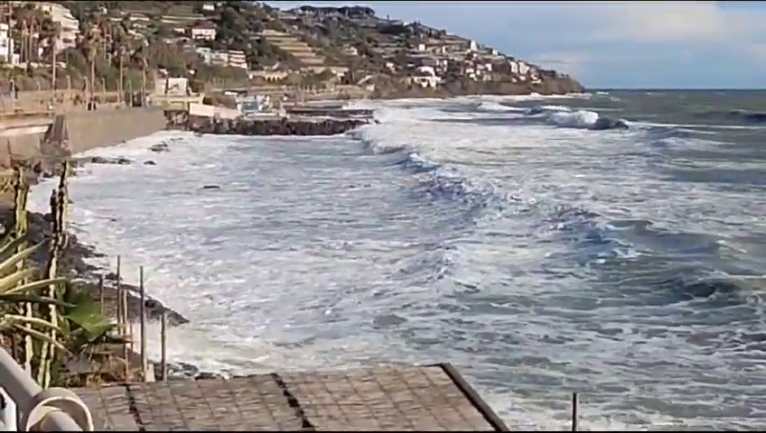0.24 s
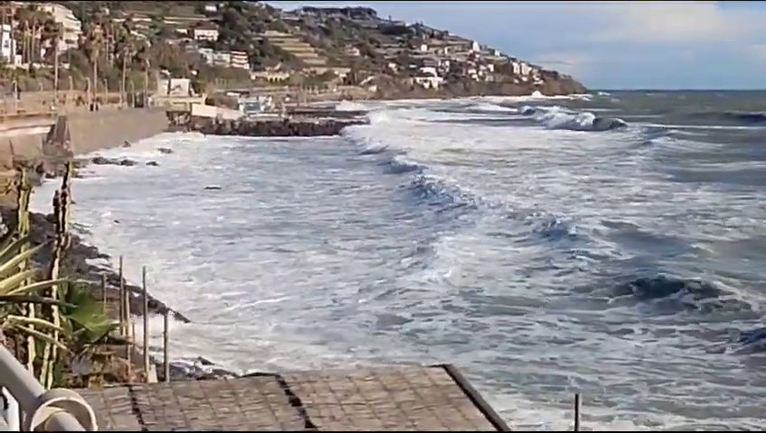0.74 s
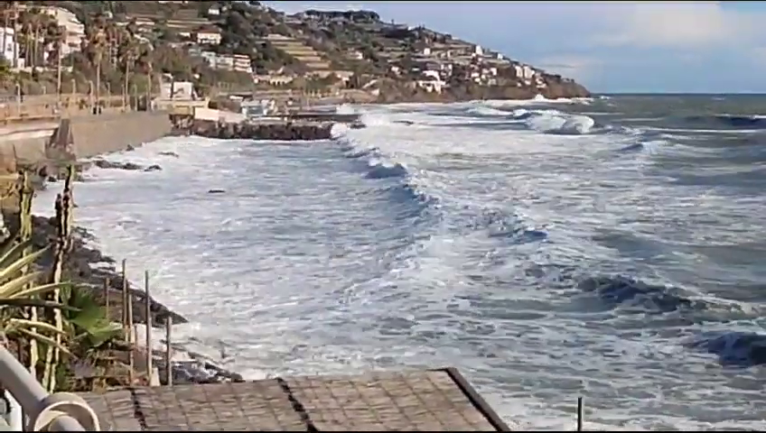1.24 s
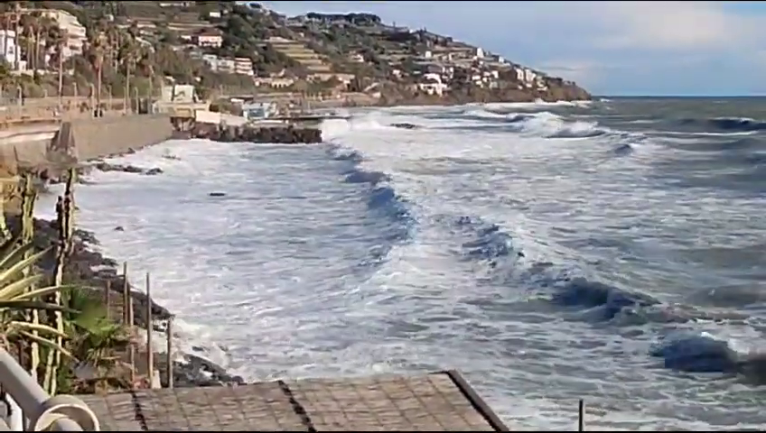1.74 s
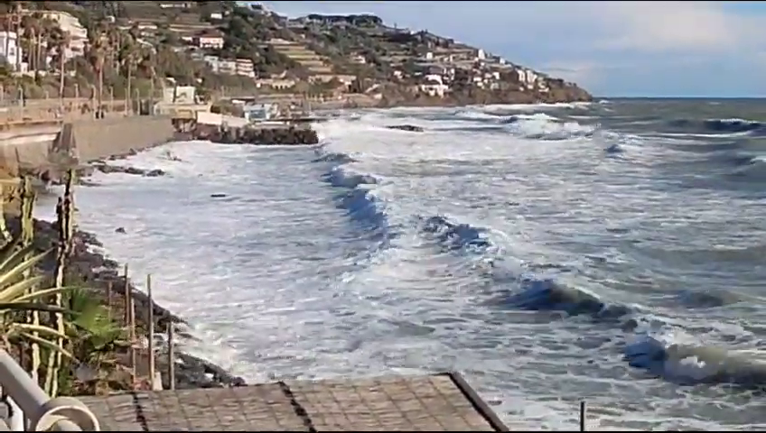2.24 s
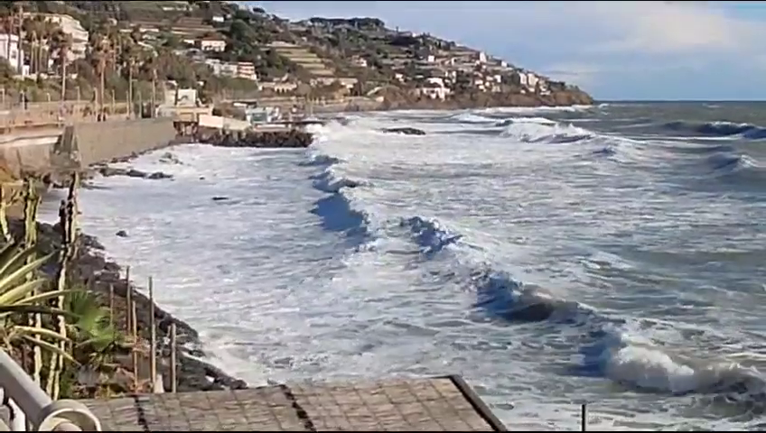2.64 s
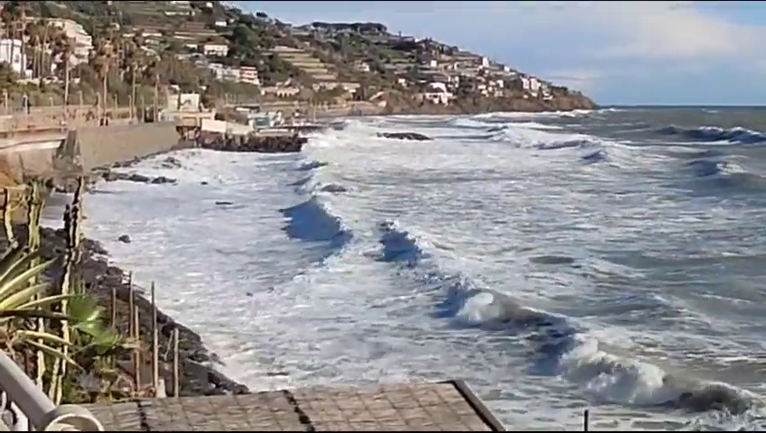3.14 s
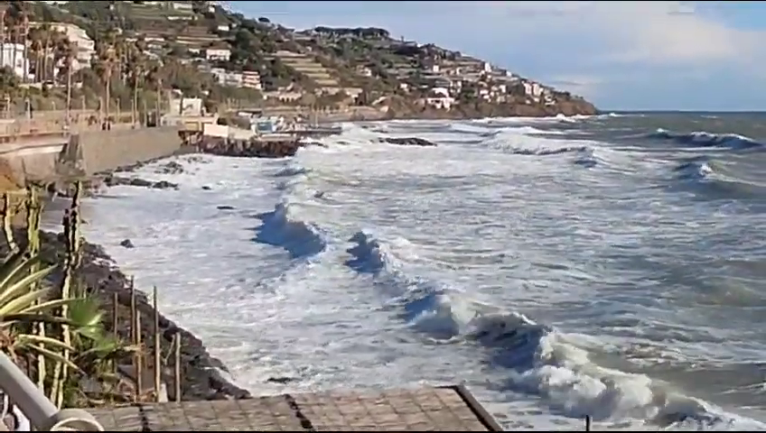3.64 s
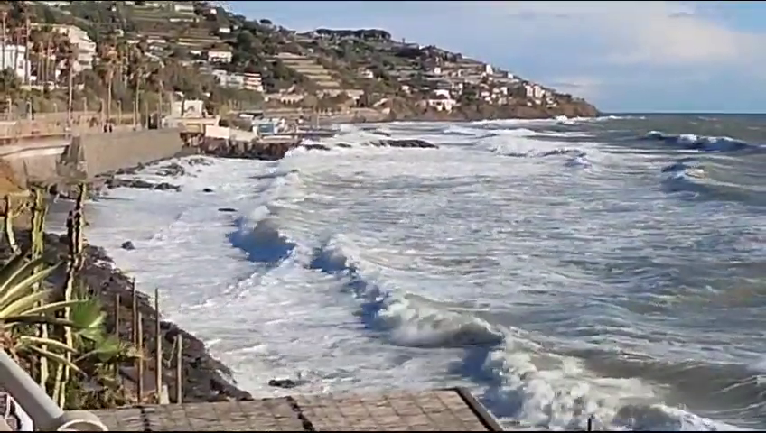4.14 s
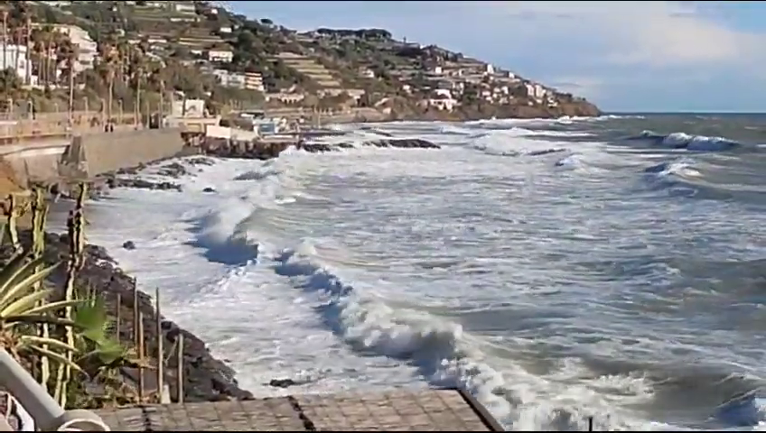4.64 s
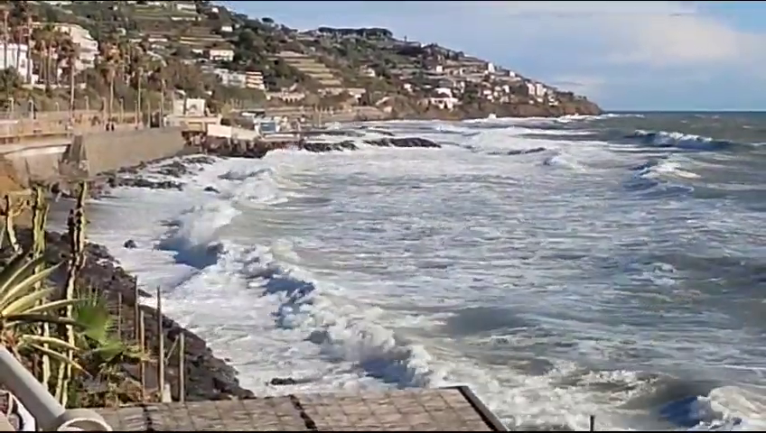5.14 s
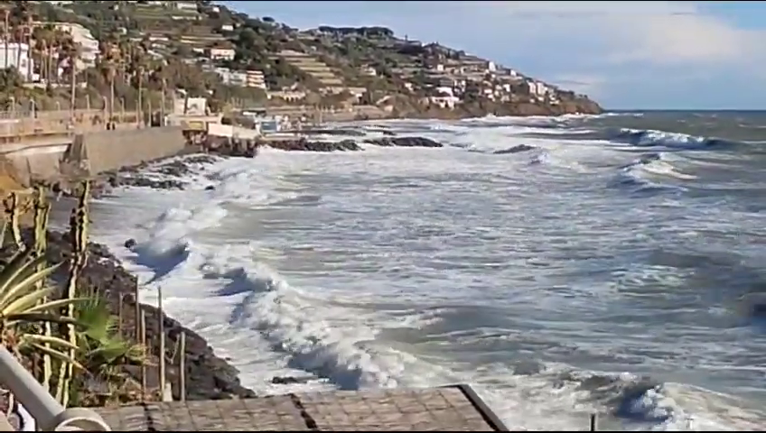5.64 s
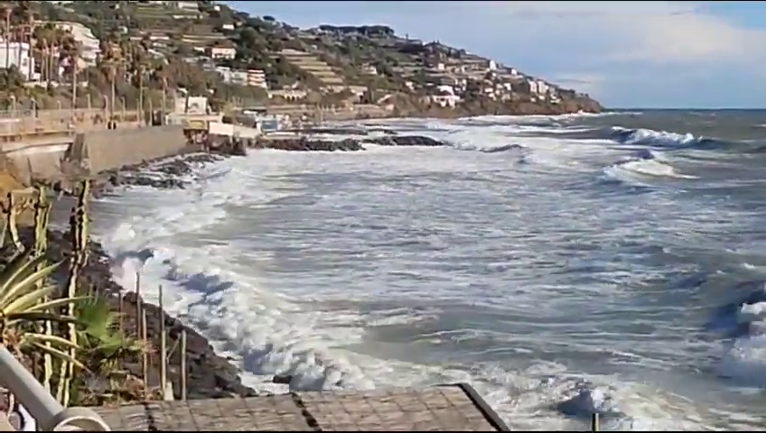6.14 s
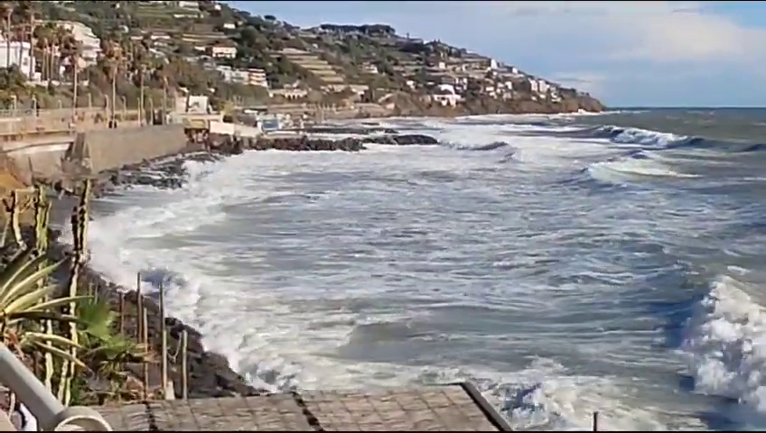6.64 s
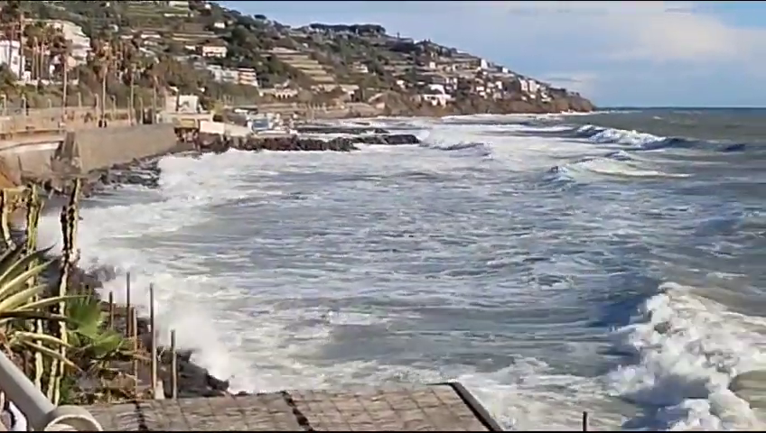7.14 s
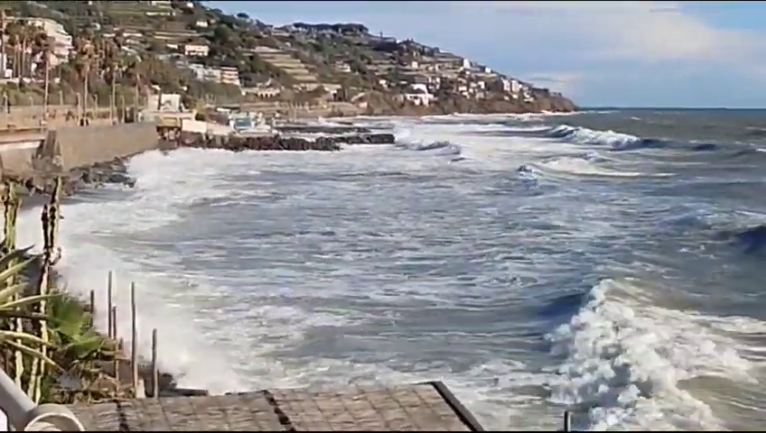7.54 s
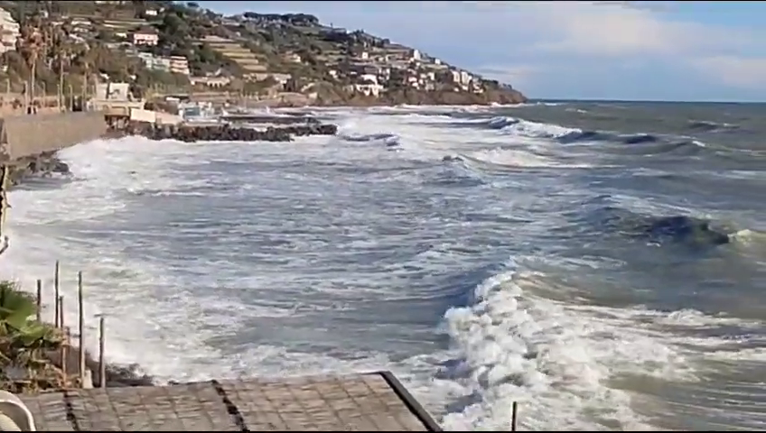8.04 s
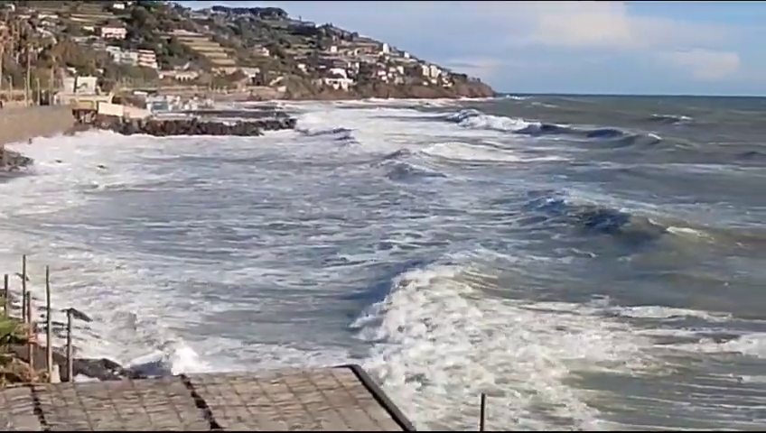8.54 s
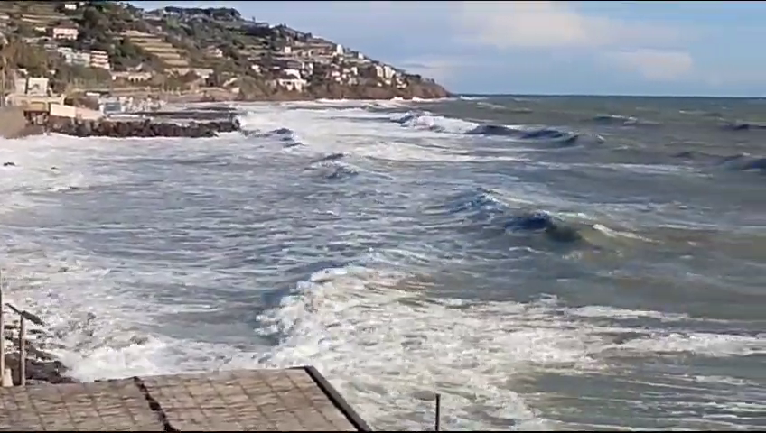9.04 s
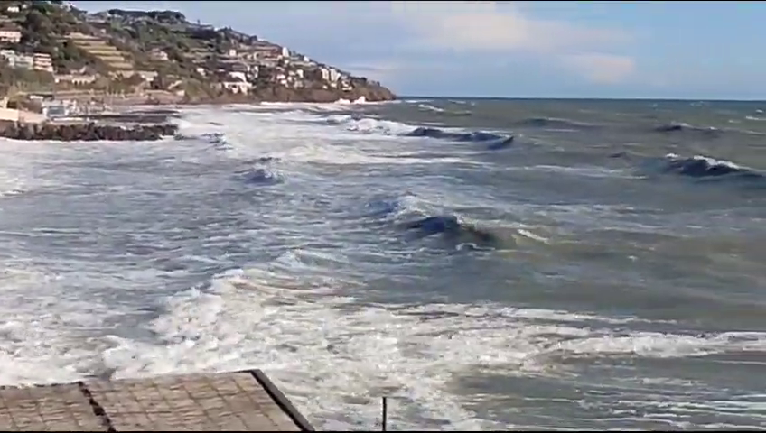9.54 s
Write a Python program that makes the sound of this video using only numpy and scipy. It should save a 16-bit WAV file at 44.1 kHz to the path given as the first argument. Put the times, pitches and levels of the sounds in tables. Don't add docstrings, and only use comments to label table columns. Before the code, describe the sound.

Heard from an open terrace above the shore on a handheld phone: broad rushing breakers with no silence between waves, gently rising and falling. A rapid dull chugging flutter modulates the noise throughout. Irregular wind thuds, flaps and sharp cracks hit one side or the other, strongest near two and a half and four seconds, then fade after six. The treble is slightly thin, grainy and compressed.

```python
import sys
import numpy as np
from scipy import signal
from scipy.fft import rfft, irfft, dct
from scipy.io import wavfile
from scipy.ndimage import uniform_filter1d

SR = 44100
rng = np.random.default_rng(int(sys.argv[2]) if len(sys.argv) > 2 else 0)


def boost_factor(decibels):
    exponent = np.asarray(decibels, float) / 20
    return 10 ** exponent


def materialize(psi):
    bounded = np.clip(np.atleast_2d(psi).T, -1, 1)
    quanta = np.round(bounded * 32767).astype(np.int16)
    wavfile.write(sys.argv[1], SR, quanta)


N = 432180
TIME = np.arange(N) / SR
HZ = np.fft.rfftfreq(N, 1 / SR) + 1e-3

# time_s, foam_hiss_db, close_breaker_weight_db
WAVES = [(0, -32.5, -2.5), (.3, -31, -1.5), (1.2, -30, -2.5), (2.3, -31.5, -.5), (3.3, -32.5, 1.5),
         (3.95, -29.5, 0), (4.13, -31.5, 0.5), (4.32, -28.5, -0.5), (4.6, -30.5, 1.5), (5.1, -30, 1),
         (5.6, -31, 2), (5.97, -29.5, -1.5), (6.06, -32, 0), (7.0, -32, -1), (8.0, -34, 0),
         (8.9, -32.5, 0.5), (9.5, -32, 0.5), (9.8, -31, 1)]
# pitch_hz, level_db (per Hz)
SURF_BASS = [(15, 3.5), (32, 12), (55, 6.5), (159, 7), (250, 3.5), (363, -0.5), (520, -1.5), (760, -2)]
# pitch_hz, level_db (per Hz)
SURF_LEFT = [(1000, -5), (1350, -4), (1850, -4), (2300, -11.5), (2800, -16), (4000, -7.5), (5600, -8),
             (5950, -10), (6300, -10), (6800, -7), (7600, -3.5), (8000, -6.5), (8190, -16), (8320, -13.5),
             (8700, -22.5),
             (8850, -29.5), (9000, -24), (9700, -27), (10250, -20.5), (11000, -20), (12000, -23.5),
                 (13600, -22.5), (14400, -24), (14800, -18), (15300, -21), (15600, -23)]
SURF_RIGHT = [(1050, -8), (1450, -6), (2100, -10.5), (2750, -8), (3400, -8.5), (4000, -4), (5000, -3.5),
              (5600, -7), (6100, -6.5), (6550, -7), (7000, -12), (7850, -15.5), (8190, -38), (8330, -24.5),
              (8700, -34),
              (8850, -45), (9050, -28), (9450, -23), (9650, -29.5), (10100, -25), (11000, -23),
                  (12800, -22), (14300, -24.5), (14700, -21), (15300, -23), (15600, -25)]
# left_port_lag_samples, level_db, bass_gain_db
SHORE_STRETCHES = [
    (-16, 1, 0),
    (-9.5, -4.5, 2),
    (-1, -8, 6),
    (10.5, -6.5, 2),
    (18.5, -0.02, 0),
]
# pitch_hz, level_db
SCATTERED = [(300, -17), (1500, -6.5), (4000, -0.5), (9000, 0.5)]
# pitch_hz, wander_db
RESTLESS = [(100, .95), (1000, 0.7), (4000, 0.73), (8000, 0.77), (12000, .7)]
# pitch_hz, db_per_db_of_foam, db_per_db_of_weight
WAVE_RESPONSE = [(61, 1.5, 0.34), (240, 1, 0.3), (580, 1.56, 1.28), (1345, 1., 1.), (4300, 1, 0),
                 (7000, 0.42, 0), (11700, 0.6, 0.1)]
# time_s, left_port_opening_db
PHONE_TURN = [(0, 0), (.6, .5), (1.6, .5), (2.2, -.5), (3.2, 0), (4.2, 1), (5.3, 2), (5.9, 1), (6.4, -.5),
              (7, -2), (8.2, -2.5), (8.8, 0), (9.8, 1)]
# pitch_hz, share
TURN_SHADOW = [(1200, .2), (2500, .7), (4200, 1.2), (5800, .4), (8000, 0.25)]
BASS_SPREAD_HZ = 999
ROUND_HZ, ROUND_LAG = 10650, 31

BEAT_HZ = 17.1
# time_s, beats_ahead
BEAT_DRIFT = [(0.0, -0.52), (1.05, -0.41), (1.84, -0.47), (2.2, -0.25), (2.49, -0.24), (2.96, -0.64),
              (3.48, -0.81), (3.8, -1.24), (4.04, -1.1), (4.18, -0.74), (4.99, -0.65), (5.55, -0.2),
              (6.13, -0.18), (6.92, -0.8), (7.46, -0.73), (7.65, -0.44), (8.73, -0.56), (9.8, -0.53)]
# time_s, share_of_full_depth
THROB_STRENGTH = [(0, 1), (.8, 0.81), (1.1, 1.2), (1.55, 0.66), (2.05, 1.1), (2.5, .8), (3.1, 1),
                  (3.6, .65), (4.6, 0.79), (5.4, 1), (5.9, 0.68), (6.5, 1.1), (6.85, .5), (7.2, 1.2),
                  (8.5, 1.05), (8.95, 0.73), (9.3, 0.91), (9.8, 0.54)]
# pitch_hz, lead_beats, left_depth_db, right_depth_db
BEAT_SWELL = [(60, .23, 4, 4), (250, .13, 3, 3), (1400, .02, 3, 3), (2000, 0, 4, 4.5), (2900, .02, 1, 3),
              (4100, .03, 2, 5.5), (5800, .06, 2.5, 2.5), (7500, 0, 6, 5), (9000, .03, 7, 7),
              (12000, 0, 5, 4)]
# pitch_hz, width_hz, level_db
THUMP_RESONANCES = [
    (36, 14, 1.5),
    (79, 43, 8.5),
    (146, 51, -40),
]
# pitch_hz, level_db (per Hz)
VENT_TONE = [(2300, -29.5), (2800, -7), (3150, -1), (3450, -1), (3900, -3.5), (4500, -8), (5300, -31)]
VENT_DB, VENT_LAG = (-45.5, -36.5), -14

# middle_s, half_length_s, rumble_db, flap_db (against the rumble)
BUFFETS_LEFT = [(.554, 0.031, -16, -10), (.767, 0.022, -19, -4), (.921, 0.04, -16, -1.5),
                (1.067, 0.02, -15.5, -7.5), (1.15, 0.04, -18.5, -11.5), (1.25, 0.082, -21, -9),
                (1.381, 0.034, -20.5, -1), (1.49, 0.052, -25, 1), (1.986, 0.041, -13, -8),
                (2.44, 0.033, -18.5, 2), (2.508, 0.044, -10.5, -2.5), (2.741, 0.082, -20, 0),
                (2.83, 0.052, -18.5, 0.5), (3.603, 0.029, -20.5, -2), (3.8, 0.048, -24, -1),
                (3.893, 0.027, -19, -6), (3.972, 0.035, -16.5, -5), (4.052, 0.028, -13, -11),
                (4.135, 0.071, -15, -3.5), (4.3, 0.076, -19.5, -8), (4.385, .035, -15, -12),
                (4.515, 0.048, -15, -11), (4.69, 0.081, -16.5, -7), (4.767, 0.037, -16, -6),
                (5.007, 0.059, -21, -4), (5.117, 0.026, -25, -5), (5.232, 0.034, -22, -7),
                (5.683, 0.046, -15, -5.5), (5.785, 0.04, -19.5, -7), (6.291, 0.046, -22.5, -6)]
BUFFETS_RIGHT = [(.217, .1, -33, -6), (.964, 0.032, -17.5, -5.5), (1.12, 0.024, -26, -8),
                 (1.357, 0.04, -21, -11), (1.446, 0.062, -18, -2), (1.557, 0.034, -17.5, -5),
                 (1.92, 0.069, -21.5, -1.5), (2.117, .035, -20, -2.5), (2.219, 0.042, -27, 5),
                 (2.3, 0.021, -17.5, 6), (2.439, 0.092, -22.5, -7), (2.547, 0.055, -23.5, -5),
                 (2.783, 0.023, -18, 2), (3.875, 0.083, -21.5, 6), (3.935, .03, -27, 7),
                 (3.981, .015, -27, 4), (4.045, 0.043, -17, 7), (4.095, 0.033, -17.5, 7.5),
                 (4.28, 0.026, -19, 1.5), (4.315, 0.042, -20, 3.5), (4.36, 0.029, -23, 3),
                 (4.515, 0.057, -19.5, -2.5), (4.648, 0.039, -19, -2), (4.716, 0.033, -23.5, 0),
                 (4.765, 0.026, -17, -5), (5.037, 0.023, -21, -3), (5.221, .04, -27, 0),
                 (5.435, 0.018, -19.5, -5), (5.694, .04, -24, 2)]
# middle_s, half_length_s, level_db
CRACKS_LEFT = [
    (2.508, 0.033, -32),
    (3.969, 0.02, -27),
    (4.15, 0.044, -31),
    (4.773, 0.039, -36),
    (5.006, .03, -30),
]
CRACKS_RIGHT = [(1.446, 0.035, -45), (2.3, 0.015, -35), (2.783, 0.02, -34), (3.895, 0.053, -29.5),
                (3.94, 0.015, -29), (4.035, 0.022, -27), (4.066, 0.021, -22), (4.098, 0.011, -15),
                (4.22, .008, -27), (4.301, 0.049, -27), (4.515, 0.055, -33)]
# rumble_db, flap_db, snap_db
CALM_BREEZE = [
    (-32.5, -40, -43),
    (-36, -40, -48.5),
]
# pitch_hz, level_db (per Hz)
RUMBLE_TONE = [(12, -9.5), (30, 7.5), (90, 4.5), (160, 0), (300, -19.5)]
FLAP_TONE = [(80, -20.5), (140, 0), (260, 5.5), (420, -2), (700, -13), (1200, -41.5)]
SNAP_TONE = [(300, -22.5), (520, 1.5), (800, -3.5), (1600, -7), (2400, -28)]
FALL_DB, RISE_SHARE, FLAP_SHARE, FLAT = 14, .8, .9, 2.5
# time_s, peak_db, pitch_hz, push_or_pull (sign and size)
HEAVES_LEFT = [(.904, -13, 80, -0.93), (.923, -7.5, 45, -1.1), (.933, -6.5, 110, 0.96), (1.38, -8.5, 90, 1),
               (2.486, -7, 130, -1.2), (2.524, -8.5, 80, -1.1), (3.893, -14, 78, -0.92),
               (3.956, -6, 79, -1), (3.974, -3.5, 65, 0.89), (4.051, -12, 98, 1), (4.127, -7, 44.8, -0.9),
               (4.367, -12, 82, -0.79), (4.391, -11, 100, 0.82), (4.453, -10.5, 92, -1),
               (4.51, -12, 68.7, 1), (5.706, -10, 74, 0.71)]
HEAVES_RIGHT = [
    (1.435, -12, 107, 0.85),
    (4.024, -12, 96, 0.58),
    (4.116, -11, 111, -0.84),
    (4.304, -11, 95, -1),
]
# time_s, peak_db, pitch_hz
SLAPS_LEFT = [(0.913, -11.5, 200), (0.98, -9.5, 180), (1.063, -12, 197), (1.475, -9.5, 259),
              (1.989, -13.5, 220), (2.447, -12, 210), (2.473, -12, 250), (2.495, -10, 259),
              (2.505, -5.5, 241), (2.514, -10, 280), (2.525, -5, 260), (2.537, -14, 267), (2.739, -12, 290),
              (2.833, -11, 285), (3.81, -10.5, 263), (3.959, -9, 318), (3.966, -12, 302),
              (3.986, -9.5, 310), (4.051, -9, 200), (4.07, -10, 450), (4.151, -8.5, 283), (4.528, -11, 211),
              (4.71, -12.0, 250), (4.763, -13, 350), (4.772, -7.5, 212), (5.69, -16, 228)]
SLAPS_RIGHT = [(1.427, -10.5, 197), (2.117, -12.5, 232), (2.294, -9.5, 370), (2.306, -10, 244),
               (2.77, -7.5, 300), (2.787, -10, 250), (2.795, -12, 228), (3.849, -12.5, 282),
               (3.865, -9.5, 300), (3.872, -12, 303), (3.882, -7.5, 290), (3.903, -10.5, 342),
               (3.93, -11, 290), (3.944, -9.5, 438), (3.981, -9.5, 264), (4.032, -1, 356), (4.045, -7, 310),
               (4.052, -7, 298), (4.065, -4.5, 300), (4.074, -9.5, 288), (4.085, -3, 370),
               (4.093, -9.5, 520), (4.099, -6, 430), (4.0995, -18, 1400), (4.104, -6, 620),
               (4.114, -15, 446), (4.273, -10, 330), (4.28, -7.5, 281), (4.298, -8, 333),
               (4.315, -6.5, 220), (4.326, -8, 328), (4.353, -13, 273), (4.519, -10, 360),
               (4.657, -17, 252), (4.708, -15, 189), (5.443, -12, 290)]
SLAP_CYCLES, SLAP_EDGE_DB = .7, -13

# pitch_hz, step_db (against the level nearby)
COARSE_STEPS = [(300, -12), (700, -5), (1150, 4), (1800, 2.5), (2600, 5.5), (4000, 4), (5500, 7), (6100, 8),
                (6800, 7.5), (8300, 7.5), (8900, 12), (9500, 10.5), (10500, 9.5), (12000, 10.5),
                (12800, 8.5), (13500, 11), (14300, 9.5)]
# time_s, pitch_hz, extra_step_db
THIN_PATCH = [(0, 6100, 3.5), (3.2, 6050, 3), (3.5, 5600, 1.5), (5.4, 5550, 1.5), (5.8, 6050, 1),
              (6.7, 6100, 2), (6.9, 6100, 4.5), (9.8, 6150, 4.5)]
# pitch_hz, share
BASS_MASKING = [(700, 0), (1150, 0.95), (1900, 0)]
PAIRED_HZ, THIN_PATCH_HZ = 1900, 260
CEILING = .95


def unit(x):
    return x / np.sqrt(np.mean(x ** 2))


def colour(points, hz):
    return np.interp(np.log(hz), np.log([p[0] for p in points]), [p[1] for p in points])


def curves(table):
    s, *columns = np.transpose(table)
    return [np.interp(TIME, s, c) for c in columns]


def walk(rate):
    hold = int(SR / rate)
    steps = np.repeat(rng.standard_normal(N // hold + 1), hold)
    return unit(uniform_filter1d(uniform_filter1d(steps, hold), hold)[:N])


def port_delay(lag):
    return np.exp(-1j * np.pi * HZ * lag / SR * np.array([[1], [-1]]))


def beats():
    return BEAT_HZ * TIME + curves(BEAT_DRIFT)[0]


def beat_peak(count, sharp):
    return np.exp(sharp * (np.cos(2 * np.pi * count) - 1))


def swell(count, sharp=2.4, second=.33, place=.37):
    shape = beat_peak(count, sharp) + second * beat_peak(count - place, sharp)
    return shape - shape.mean()


def shore():
    ports = np.zeros((2, len(HZ)), complex)
    bass = np.clip(2 * np.log2(BASS_SPREAD_HZ / HZ), 0, 1)
    gains = [boost_factor(db + bass_db * bass) for _, db, bass_db in SHORE_STRETCHES]
    for (lag, *_), gain in zip(SHORE_STRETCHES, gains):
        ports += gain * rfft(rng.standard_normal(N)) * port_delay(lag)
    direct = np.sum(np.square(gains), axis=0)
    bend = port_delay(ROUND_LAG)
    one, other = rfft(rng.standard_normal((2, N))) / np.sqrt(2)
    ports = np.where(HZ < ROUND_HZ, ports / np.sqrt(direct), one * bend + other / bend)
    scatter = boost_factor(colour(SCATTERED, HZ))
    ports = ports + scatter * rfft(rng.standard_normal((2, N)))
    ports /= np.sqrt(1 + scatter ** 2)
    left_db = colour(SURF_BASS + SURF_LEFT, HZ)
    right_db = colour(SURF_BASS + SURF_RIGHT, HZ)
    return ports * boost_factor([left_db, right_db])


def surf(count):
    ports, out = shore(), np.zeros((2, N))
    hiss_db, weight_db = curves(WAVES)
    rise_db = [c - c.mean() for c in (hiss_db, weight_db)]
    response, puff = np.array(WAVE_RESPONSE), np.array(BEAT_SWELL)
    throb, turn = curves(THROB_STRENGTH)[0], curves(PHONE_TURN)[0]
    effort, churn = walk(17), walk(12)
    for hz in 16 * 2 ** np.arange(0, 10.1, .5):
        mask = np.cos(np.pi * np.clip(np.log2(HZ / hz), -.5, .5)) ** 2
        share = [colour(response[:, [0, k]], hz) for k in (1, 2)]
        early, *depth_db = [colour(puff[:, [0, k]], hz) for k in (1, 2, 3)]
        churn = .7 * churn + .75 * walk(8)
        effort = .75 * effort + .66 * walk(15)
        strength = np.clip(throb + .2 * effort, 0, 2)
        db = np.dot(share, rise_db) + colour(RESTLESS, hz) * churn
        db = db + np.outer(depth_db, strength * swell(count + early))
        db = db + np.outer([1, -.3], colour(TURN_SHADOW, hz) * turn)
        db = db + .68 * np.array([walk(20), walk(20)])
        out += irfft(ports * mask, N) * boost_factor(db)
    hiss_band = signal.butter(4, [2500, 8000], "bandpass", fs=SR, output="sos")
    hiss = signal.sosfilt(hiss_band, out)
    return out / np.sqrt(np.mean(hiss ** 2)) * boost_factor(hiss_db.mean() + 3.5)


def thumps(count, db=-36, early=.33):
    pulses = np.zeros(N)
    at = np.flatnonzero(np.diff(np.floor(count + early)))
    timing, force = rng.standard_normal((2, len(at)))
    pulses[np.clip(at + (60 * timing).astype(int), 0, N - 1)] = boost_factor(2.5 * force)
    body = 0
    for f, width, gain_db in THUMP_RESONANCES:
        body = body + boost_factor(gain_db) * 1j * HZ * width / (f ** 2 - HZ ** 2 + 1j * HZ * width)
    return unit(irfft(rfft(pulses) * body, N)) * boost_factor(db)


def vent(count, sharp=2.0, uneven_db=1.5, colour_db=2.5, waver=.04):
    tone_db = colour([(1, -99)] + VENT_TONE + [(SR, -99)], HZ)
    air = rfft(rng.standard_normal(N)) * boost_factor(tone_db) * port_delay(VENT_LAG)
    high, ports = np.clip((HZ - 3000) / 1200, 0, 1), 0
    for part in (high, 1 - high):
        gate = beat_peak(count + waver * walk(17), sharp)
        ports = ports + irfft(air * part, N) * gate * boost_factor(colour_db * walk(17))
    size = curves(THROB_STRENGTH)[0] ** .4 * boost_factor(uneven_db * walk(8))
    return unit(ports * size) * boost_factor(VENT_DB)[:, None]


def buffets(s, length, peak_db, calm_db):
    power = np.full(N, boost_factor(calm_db) ** 2)
    for at, span, db in zip(s, length, peak_db):
        near = slice(max(int((at - 3 * span) * SR), 0), int((at + 3 * span) * SR))
        late = (TIME[near] - at) / span
        drop_db = FALL_DB * np.maximum(late, -late / RISE_SHARE) ** FLAT
        power[near] += boost_factor(db - drop_db) ** 2
    return np.sqrt(power)


def wind(gusts, cracks, breeze_db):
    lumps_db = [db * walk(rate) for db, rate in ((1.5, 40), (3.0, 90), (4.0, 150))]
    eddies = rng.standard_normal((3, N)) * boost_factor(lumps_db)
    s, length, db, flap_db = np.transpose(gusts)
    gains = [buffets(s, length, db, breeze_db[0]),
             buffets(s, FLAP_SHARE * length, db + flap_db - 5.5, breeze_db[1]),
             buffets(*np.transpose(cracks), breeze_db[2])]
    out = np.zeros(N)
    for eddy, tone, gain in zip(eddies, (RUMBLE_TONE, FLAP_TONE, SNAP_TONE), gains):
        tone_db = colour([(0.9, -92)] + tone + [(SR, -150)], HZ)
        out += unit(irfft(rfft(eddy) * boost_factor(tone_db), N)) * gain
    return out


def heaves(table, cycles_wide=.4):
    out = np.zeros(N)
    for at, db, hz, way in table:
        cycles = (TIME - at) * hz
        out += way * boost_factor(db) * np.exp(-(cycles / cycles_wide) ** 2) * np.cos(2 * np.pi * cycles)
    return out


def slaps(table):
    out, chance = np.zeros(N), rng.random((len(table), 2))
    for (at, db, hz), (way, edge) in zip(table, chance):
        near = slice(int((at - .02) * SR), int((at + .02) * SR))
        cycles = (TIME[near] - at) * hz
        swing = np.sign(way - .5) * np.cos(2 * np.pi * cycles)
        swing += boost_factor(SLAP_EDGE_DB) * np.cos(2 * np.pi * (2.8 * cycles + edge))
        out[near] += boost_factor(db) * np.exp(-(cycles / SLAP_CYCLES) ** 2) * swing
    return out


def phone_thinning(x, size=1024, reach=28, patchy_db=2.2, dead=.12, lazy=.4, starve=.14):
    count, hz = N // size + 2, (np.arange(size) + .5) * SR / 2 / size
    pair = np.zeros((2, (count + 1) * size))
    pair[:, size:size + N] = x
    window = np.sin(np.pi * (np.arange(2 * size) + .5) / (2 * size))
    cut = np.stack([pair[:, k * size:(k + 2) * size] for k in range(count)], axis=1) * window
    a, b, c, d = np.split(cut, 4, axis=-1)
    folded = np.concatenate([-c[..., ::-1] - d, a - b[..., ::-1]], axis=-1)
    lines = dct(folded, type=4, norm="ortho")

    patches = (rng.random((count, size // 32)) < .55).repeat(32, axis=-1)
    paired = (hz < PAIRED_HZ) | patches

    def swap(v):
        return np.where(paired, np.array([v[0] + v[1], v[0] - v[1]]) / np.sqrt(2), v)

    lines = swap(lines)
    own = uniform_filter1d(lines ** 2, reach, axis=-1) + 1e-14
    near = np.sqrt(.7 * own + .3 * own.mean(axis=0))
    lately = uniform_filter1d(own.mean(axis=0), 9, axis=0)
    near *= (np.median(lately, axis=0) / lately) ** (lazy / 2)
    luck = uniform_filter1d(rng.standard_normal((count, size // 8)), 2, axis=0).repeat(8, axis=-1)
    step = near * boost_factor(colour(COARSE_STEPS, hz) + patchy_db * np.sqrt(2) * luck)
    s, *patch = np.transpose(THIN_PATCH)
    frame_s = (np.arange(count) - .5) * size / SR
    patch_hz, patch_db = [np.interp(frame_s, s, column)[:, None] for column in patch]
    step *= boost_factor(patch_db * np.exp(-((hz - patch_hz) / THIN_PATCH_HZ) ** 2))
    power = np.mean(lines ** 2, axis=(0, 2))[:, None]
    loudness = np.clip(power / np.median(power), .5, 10)
    step *= loudness ** (starve / 2 + .15 * colour(BASS_MASKING, hz))
    lines = np.sign(lines) * np.floor(np.abs(lines) / step + .5 - dead).clip(0) * step

    u, v = np.split(dct(swap(lines), type=4, norm="ortho"), 2, axis=-1)
    back = np.concatenate([v, -v[..., ::-1], -u[..., ::-1], -u], axis=-1) * window
    pair[:] = 0
    pair[:, :-size] += back[..., :size].reshape(2, -1)
    pair[:, size:] += back[..., size:].reshape(2, -1)
    return pair[:, size:size + N]


def scene():
    count = beats()
    air = surf(count) + thumps(count) + vent(count)
    left_db, right_db = CALM_BREEZE
    left = wind(BUFFETS_LEFT, CRACKS_LEFT, left_db) + heaves(HEAVES_LEFT) + slaps(SLAPS_LEFT)
    right = wind(BUFFETS_RIGHT, CRACKS_RIGHT, right_db) + heaves(HEAVES_RIGHT) + slaps(SLAPS_RIGHT)
    return air + np.array([left, right])


def low_pass(x):
    return signal.sosfilt(signal.butter(12, 15850, fs=SR, output="sos"), x)


def record(dry):
    rounded = dry / (1 + (dry / CEILING) ** 4) ** (1 / 4)
    mix = phone_thinning(rounded)
    return low_pass(mix)


dry = scene()
out = record(dry)
materialize(out)
```